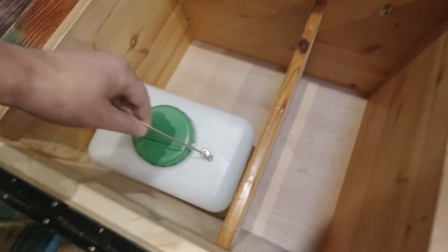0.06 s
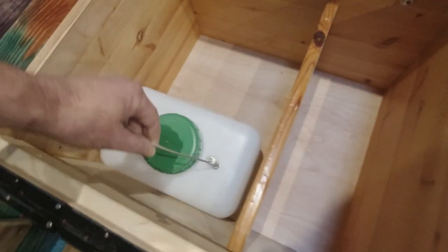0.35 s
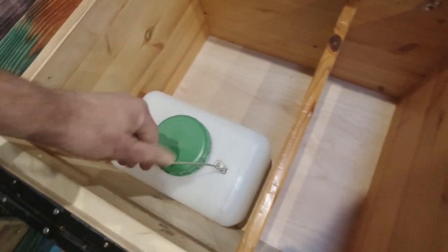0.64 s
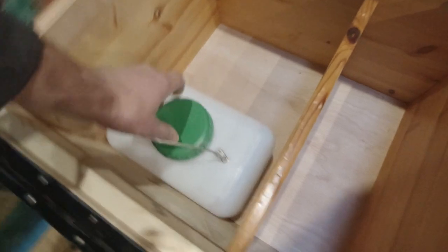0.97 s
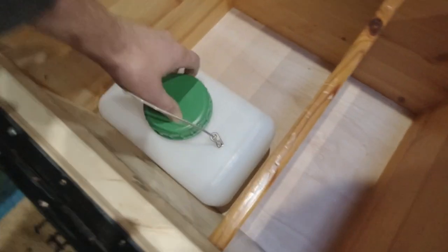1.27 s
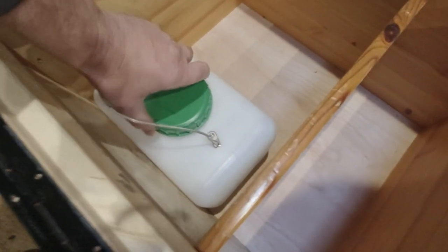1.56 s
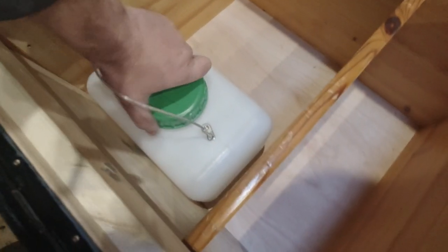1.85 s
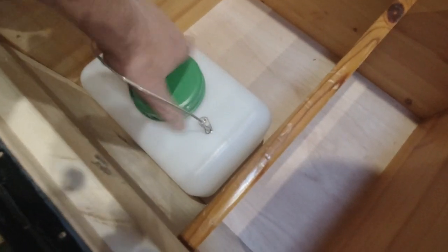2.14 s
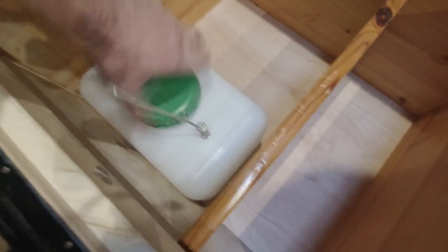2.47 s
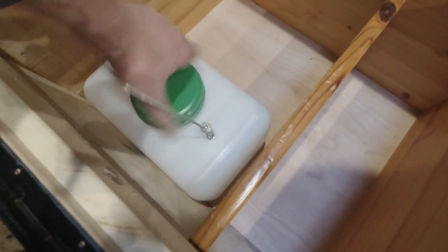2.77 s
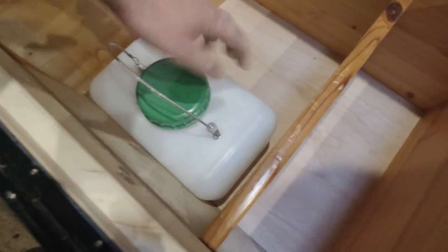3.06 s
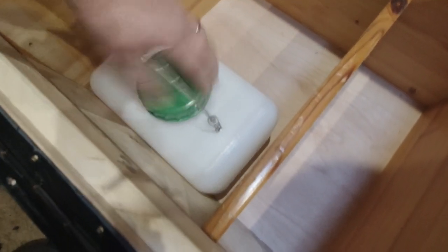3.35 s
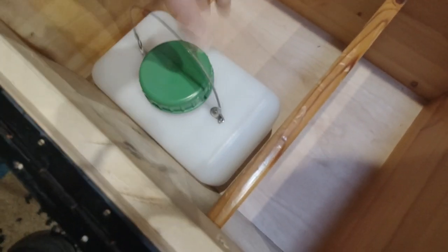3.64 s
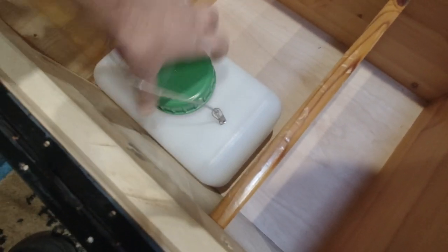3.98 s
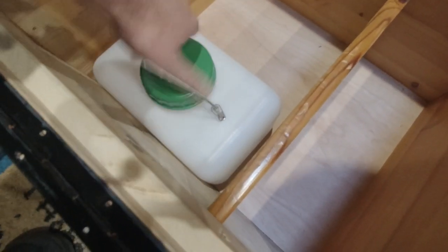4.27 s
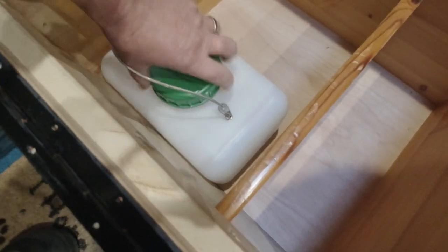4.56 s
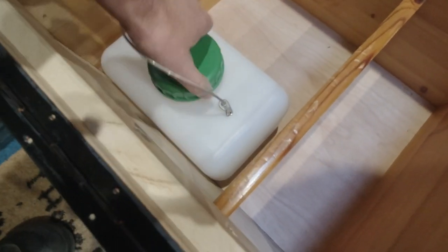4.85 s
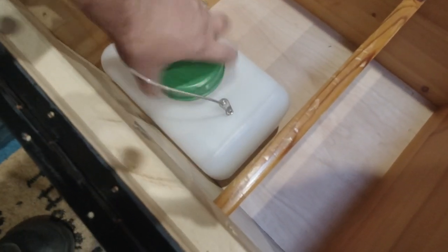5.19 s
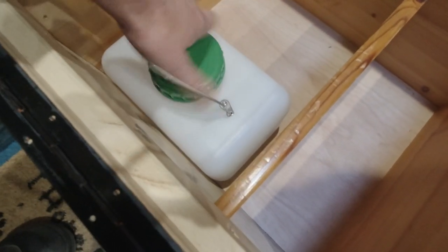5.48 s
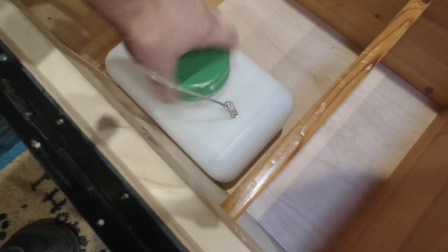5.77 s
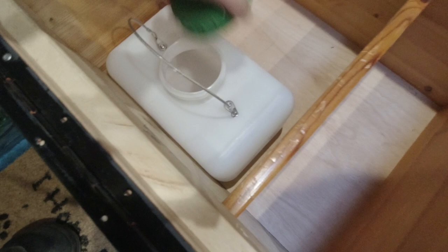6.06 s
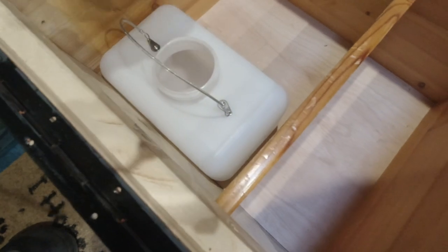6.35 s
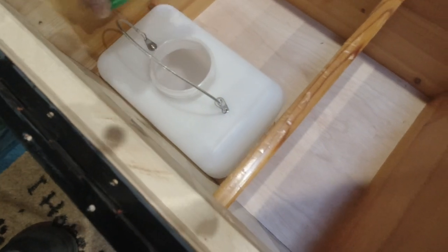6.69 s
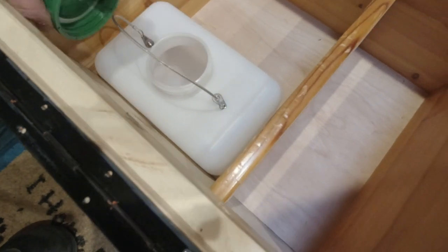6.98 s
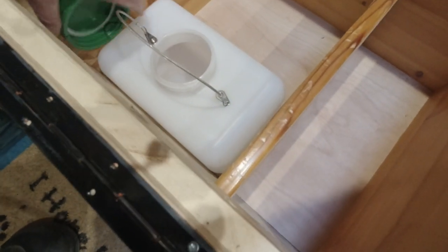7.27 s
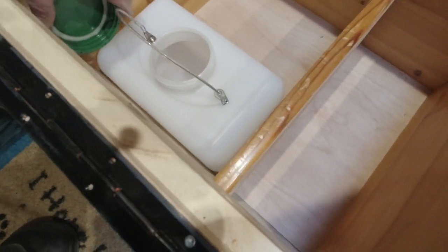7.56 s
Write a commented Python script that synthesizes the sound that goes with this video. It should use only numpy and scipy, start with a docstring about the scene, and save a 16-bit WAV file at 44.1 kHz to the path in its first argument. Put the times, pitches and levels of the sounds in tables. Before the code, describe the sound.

A wire handle is swung aside, knocking on a hollow plastic can with a low twang. A hand then unscrews the plastic cap in groups of sharp clicks, short rasps and soft thuds, with brief pauses between twists. At the end the open can is bumped and hums hollowly, and the cap clacks down on wood. The can sits in a small wooden box in a quiet room, heard from close above.

```python
"""A hollow plastic can knocks and rasps in a wooden box as a hand unscrews its cap.
Each impact excites the damped modes of walls and box, and a jolt sets the can rebounding; threads and
fingers rub by stick-slip friction. First a wire handle is swung aside and twangs; at the end the opened
can hums and the cap clacks down. A phone is held close above, in a quiet room."""
import sys
import numpy as np
from scipy import signal
from scipy.fft import rfft, irfft
from scipy.io import wavfile
from scipy.ndimage import uniform_filter1d, map_coordinates

SR = 44100
rng = np.random.default_rng(int(sys.argv[2]) if len(sys.argv) > 2 else 0)


def store_wav(level_fs):
    """Save 16-bit WAV to argv[1]."""
    pcm = np.round(np.clip(np.atleast_2d(level_fs), -1, 1) * 32767)
    wavfile.write(sys.argv[1], SR, pcm.T.astype(np.int16))


N = 344994
TIME = np.arange(N) / SR
AGE = TIME[:SR // 2]  # time since an impact
IMPACT_GAIN = np.sqrt(.03 * SR)  # unit energy to unit rms over 30 ms

# Spectra of the noises (f/Hz, relative level/dB)
AIR_SPECTRUM = [(60, -1.5), (200, -12.5), (3800, -28.5), (6000, -14.5), (12000, -26.5)]
RUMBLE_SPECTRUM = [(15, -4), (38, -12), (52, -4), (70, -1), (120, -16.5), (300, -50), (1000, -86)]
WHISTLE_SPECTRUM = [(3300, -26), (4080, -0.5), (4600, -30)]
RUSTLE_SPECTRUM = [(150, -9.5), (500, 4.5), (1500, -4.5), (4100, -5), (4900, -17)]
BRUSH_SPECTRUM = [(200, -19.5), (600, -6), (1700, -1.5), (2400, -6.5), (4100, 5), (5500, 6.5), (8000, 0.5),
                  (13000, -1)]
DRAG_SPECTRUM = [(90, -10), (180, -0.5), (310, -19), (480, 1), (700, -7), (1500, -27.5), (5000, -55.5)]
RUB_SPECTRUM = [(60, -29), (170, 7), (310, -5.5), (470, 2.5), (800, -2.5), (1300, -7.5), (2000, -13.5),
                (2400, -19), (2850, -23), (3400, -18.5), (4300, -19.5), (6000, -28.5), (12000, -37.5)]
# Spectra of the unresolved modes of room, loose cap and can (f/Hz, relative level/dB)
ROOM_SPECTRUM = [(100, 10.5), (500, -3.5), (1500, -5.5), (4000, -1.5), (6000, -6.0), (12000, 2.0)]
LANDING_SPECTRUM = [(120, -34.5), (550, -3.5), (1200, 4), (2500, -7.5), (9000, -50.5)]
KNOCK_SPECTRUM = [(70, -18), (170, 12.5), (310, -11.5), (450, -3), (700, -8), (1200, -8.5), (1750, -17),
                  (2300, -18), (3000, -17.5), (4300, -23), (7000, -32.5), (13000, -48.5)]
# Microphone response, and stereo side signal relative to mid (f/Hz, gain/dB)
MIC_RESPONSE = [(100, -1), (4400, -4.5), (5200, -17.5), (8000, -13), (10000, -23), (12000, -13)]
SIDE_RESPONSE = [(100, -39), (350, -21.5), (700, -15), (1400, -10.5), (2800, -7), (5000, -2), (9000, 1.5)]

# Normal modes (f/Hz, relative level/dB, t60/s)
WIRE_MODES = [(226.2, 4, 0.32), (275.5, -1.5, 0.15), (297.4, 0.5, 0.18), (365.8, -9, 0.24),
              (398.7, -1, 0.17)]
OPEN_CAN_MODES = [(193.5, -6.5, 0.5), (225.4, 3, 0.32), (248, -6.5, 0.39), (353, -2, 0.21),
                  (616, -21.5, 0.22), (836, -9.5, 0.16), (982, -3, 0.072), (1700, -13, 0.077),
                  (5870, -13, 0.044)]  # the strong mode near 225 Hz is the hollow hum of the open can
CAP_MODES = [(620, -1.5, 0.036), (812, -2.5, 0.15), (944, -2.5, 0.052), (1050, -5.5, 0.18),
             (1094, -0.5, 0.11), (1200, 0.5, 0.062), (1482, -3.5, 0.049), (1645, -11.5, 0.13),
             (2010, -9.5, 0.06), (2340, -11.5, 0.055), (2800, -17.5, 0.053), (4280, -21, 0.05)]
BODY_MODES = [(107, -8, 0.16), (143, -5, 0.13), (169.35, -2.5, 0.21), (173.3, 1.5, 0.15),
              (255.67, -16, 0.27), (282.3, -10, 0.13), (361.2, -9.5, 0.14), (443.7, -4, 0.099),
              (466.4, -3, 0.07), (533, -8.5, 0.11), (630, -15, 0.023), (705, -9, 0.12), (784, -4.5, 0.12),
              (845, -15, 0.16), (1047, -6, 0.13), (1234.4, -7, 0.11), (1479, -11, 0.023),
              (1706, -9.5, 0.11), (1764, -12.5, 0.13), (2035, -11.5, 0.02), (2903, -19, 0.16),
              (3670, -25.5, 0.095), (3990, -20, 0.15)]  # can and box
# Bands of a knock: can's thump, walls' knock, cap's clack, rim's snap
# (low f/Hz, high f/Hz, rise/s, t60/s, direct share)
KNOCK_BANDS = [(88, 260, 0.012, 0.076, 0.93), (256.88, 700, 0.0075, 0.1, 0.091),
               (701.1, 2200, 0.0021, .1, 0.26), (2360, 29000, 0.00033, 0.08, 0.27)]

# Spans of sustained noise (start t/s, duration/s, relative level/dB)
ARM_MOVES = [(0.0, 0.72, -52), (1.18, 0.5, -52.5), (2.07, 1.11, -51), (3.4, 2.75, -52.5)]
WHISTLES = [(1.55, 0.58, -75.5), (2.6, 0.46, -68), (4.18, .1, -71.5), (6.72, 1, -77.5)]
HAND_REACHES = [(0.0, 0.66, -60.5), (1.12, 0.18, -65), (7.15, 0.68, -67.5)]
THREAD_DRAGS = [(2.055, 0.051, -41), (2.3, 0.15, -40), (2.86, 0.11, -40), (5.9, 0.13, -42)]
RUB_STROKES = [(0.484, 0.0039, -41.5), (0.63, 0.021, -49.5), (1.26, 0.19, -63.5), (1.42, 0.52, -71),
               (2.05, 0.058, -44), (2.275, 0.15, -46), (2.525, 0.025, -43), (2.6, 0.077, -52),
               (2.85, 0.18, -41.5), (3.46, 0.18, -55), (3.96, 0.2, -67), (4.275, 0.19, -45),
               (4.785, 0.14, -42), (4.99, 0.1, -52), (5.37, 0.14, -41), (5.75, 0.018, -60.5),
               (5.918, 0.035, -39), (5.988, 0.033, -39), (6.513, 0.039, -48)]  # twists of the cap, slides of wire and skin
# Light touches of skin and cap on plastic and wood (centre t/s, half duration/s, level/dB)
BRUSHES = [(2.082, 0.055, -59), (2.343, 0.11, -53.5), (4.849, 0.037, -45), (6.526, 0.024, -43),
           (7.099, 0.041, -52), (1.28, 0.035, -55.5), (7.437, 0.07, -53), (7.687, 0.077, -57.5)]

# The handle strikes the can (t/s, level/dB, gain of lowest mode/dB)
WIRE_BLOWS = [(0.136, -16.5, -8.5), (0.355, -19, -14.5)]
# Bumps on the open can (t/s, level/dB, gain of upper modes/dB)
OPEN_CAN_BLOWS = [(6.476, -16.5, -0.5), (7.371, -37, 15.5), (7.439, -26.5, -14.5), (7.665, -31, -17)]
# The loose cap is set down, tips and settles (t/s, level/dB, tilt/(dB/octave))
CAP_LANDINGS = [(7.3714, -23.5, 0), (7.437, -25, -6.5), (7.661, -32, -3.5)]
# Contacts of cap edge, fingertips and wire (t/s, level/dB, centre f/Hz)
CLINKS = [(0.132, -33.5, 1248), (0.327, -44.5, 1560), (0.486, -35, 1236), (0.621, -38.5, 1560),
          (0.649, -43.5, 1510), (1.129, -66.5, 3650), (1.159, -63, 2810), (1.26, -52, 3220),
          (2.566, -55, 2070), (2.844, -42, 1262), (2.974, -49.5, 2826), (3.068, -31, 1176),
          (3.522, -48.5, 1973), (3.569, -42.5, 1100), (3.614, -42.5, 1645), (4.155, -60, 940),
          (4.321, -31, 1684), (4.395, -28, 1710), (5.037, -37, 1211), (5.531, -30.5, 1424),
          (5.763, -42, 850), (5.885, -50.5, 987), (6.513, -49.5, 1540), (6.532, -44.5, 1560),
          (7.176, -57.5, 2650), (7.322, -54.5, 3030)]
# Hard clicks and knocks of cap, threads and handle on the can
# (t/s, level/dB, tilt/(dB/octave), thump/dB)
HARD_CLICKS = [(0.464, -32, -2, -26), (1.258, -42.5, -5.5, -47.5), (2.476, -45.5, 1.5, -39.5),
               (2.628, -46.5, 2, -47), (2.68, -28, 1.9, -24), (2.846, -34.5, -1, -32),
               (2.973, -33.5, -0.5, -29.5), (3.066, -32, -0.5, -35), (3.082, -29, -2.5, -35),
               (3.403, -30, 0.83, -26), (3.523, -53, 5.5, -79), (3.571, -41, -4.5, -44.5),
               (3.613, -43.5, -0.5, -48), (3.971, -52.5, 0, -47.5), (4.153, -41, -3, -36),
               (4.323, -24.5, 2, -29.5), (4.396, -24, 1.2, -41), (4.419, -30, -2.5, -38.5),
               (4.501, -43.5, -1.5, -49), (4.748, -52.5, 1.5, -49.5), (4.825, -22.5, 0, -29.5),
               (4.963, -52, 1.5, -50), (5.037, -32.5, -0.8, -34), (5.062, -35.5, -2.5, -34.5),
               (5.314, -49, -0.5, -43), (5.365, -25.5, -1, -44.5), (5.45, -36.5, -0.5, -29.5),
               (5.53, -30.5, 0.5, -68), (5.541, -24, -1.5, -32.5), (5.621, -43, -2.5, -43.5),
               (5.763, -37, -1.5, -39), (5.884, -38.5, -2, -34), (6.473, -50, 5.5, -50.5),
               (7.437, -25, -1.5, -21)]
# Soft pushes of the fingers (t/s, thump/dB, wall knock/dB)
FINGER_THUDS = [(1.382, -36.5, -45.5), (1.471, -41, -62.5), (1.786, -36.5, -45), (2.784, -28.5, -38.5),
                (2.956, -31.5, -52), (3.627, -33, -46), (3.805, -40, -53.5), (4.001, -38.5, -61.5),
                (4.66, -48.5, -45), (4.896, -24, -35.5), (4.996, -31, -36.5), (5.394, -29, -62.5),
                (5.919, -26, -38.5), (5.959, -30, -37.5), (6.028, -33, -42), (6.075, -31, -73),
                (6.126, -40.5, -64.5)]
# The can rocks (t/s, level/dB, tilt/(dB/octave), thump/dB, first rebound/dB, loss per rebound/dB)
JOLTS = [(0.131, -26, -1.1, -38, -34, 25.5), (0.328, -21.5, -1, -31.5, -37.5, 28),
         (0.4327, -25.5, -2.5, -18.5, -24, 25.5), (0.483, -25, -4, -41, -35.5, 22),
         (0.622, -26, -2.5, -19, -21.5, 7.5), (7.662, -30.5, 1, -38, -30.5, 9.5)]

GRIP_DETUNE = .022  # relative scatter of mode frequencies under the hand


def undb(db):
    """Amplitude ratio of a level in decibels."""
    return 10 ** (np.asarray(db) / 20)


def unit(x):
    """Normalisation to unit energy."""
    return x / np.sqrt(np.sum(x ** 2) + 1e-18)


def gains(points, size):
    """Frequency response at each bin, interpolated in decibels over log frequency."""
    hz, db = np.transpose(points)
    bin_hz = np.arange(size // 2 + 1) * SR / size
    return undb(np.interp(np.log(bin_hz + 1), np.log(hz), db))


def colour(x, points):
    """Linear filtering by multiplication of spectra."""
    return irfft(rfft(x) * gains(points, len(x)), len(x))


def noise(points):
    """Stationary filtered Gaussian noise of unit rms."""
    return unit(colour(rng.standard_normal(N), points)) * np.sqrt(N)


def fade(t60, size=len(AGE)):
    """Exponential damping: 60 dB in t60 seconds."""
    return np.exp(-np.log(1000) * AGE[:size] / t60)


def ring(modes, scatter_db=0, size=len(AGE), detune=0):
    """Modal superposition: the contact point sets strength and phase, the grip shifts frequency."""
    out = np.zeros(size)
    for hz, db, t60 in modes:
        pitch = hz * (1 + detune * rng.standard_normal())
        envelope = undb(db + scatter_db * rng.standard_normal()) * fade(t60, size)
        out += envelope * np.sin(2 * np.pi * (pitch * AGE[:size] + rng.random()))
    return out


def add(track, s, sound):
    """Superposition of a sound on a track, starting at s seconds."""
    start = max(int(s * SR), 0)
    track[start:start + len(sound)] += sound[:N - start]


def swells(spans, arch_db=3.5, attack_s=0.18, release_s=0.026):
    """Incoherent addition: arched envelopes sum in power; attack and release each cover 60 dB."""
    power = 0
    for start, length, db in spans:
        along = np.clip((TIME - start) / length, 0, 1)
        arch = undb(db - arch_db * (2 * along - 1) ** 2)
        before = np.maximum(start - TIME, 0) / attack_s
        after = np.maximum(TIME - start - length, 0) / release_s
        skirts = np.exp(-np.log(1000) * np.minimum(before + after, 2))
        power = power + (arch * skirts) ** 2
    return np.sqrt(power)


def air(level_db=-71):
    """Stationary background noise of the quiet room."""
    return undb(level_db) * noise(AIR_SPECTRUM)


def rumble(rest_db=-78.5):
    """Structure-borne handling noise, which rises while the arm moves."""
    motion = swells(ARM_MOVES, arch_db=-1.5, attack_s=0.23, release_s=0.68)
    return (motion + undb(rest_db)) * noise(RUMBLE_SPECTRUM)


def room(x, t60=0.43, wet_db=-21):
    """Reverberation: convolution with a faint diffuse tail."""
    tail = colour(rng.standard_normal(len(AGE)), ROOM_SPECTRUM) * fade(t60)
    return x + undb(wet_db) * signal.fftconvolve(x, unit(tail))[:N]


def box_reflections(x, ripple_hz=70, echo_t60=0.065, echo_share=.8, drift_hz=1.2):
    """Interference: reflections reach two microphones in unlike phase, drifting as hand and phone move."""
    hz = np.arange(N // 2 + 1) * SR / N
    ripple = np.interp(hz / ripple_hz, np.arange(600), rng.standard_normal(600))
    side_spectrum = gains(SIDE_RESPONSE, N) * rfft(x)
    quadrature = irfft(1j * ripple / ripple.std() * side_spectrum, N)
    tail = unit(rng.standard_normal(len(AGE)) * fade(echo_t60))
    echoes = irfft(side_spectrum * rfft(tail, N), N)
    drifting = np.real(signal.hilbert(echoes) * np.exp(2j * np.pi * drift_hz * TIME))
    side = (quadrature + echo_share * drifting) / np.hypot(1, echo_share)
    return np.array([x + side, x - side])


def whistle():
    """Narrow-band noise, heard as a faint whistle that comes and goes."""
    return swells(WHISTLES) * noise(WHISTLE_SPECTRUM)


def hollow_resonance(x, t60=0.044, wet_db=3):
    """Modal overlap: close resonances of shell and box give friction a hollow grain."""
    response = unit(rng.standard_normal(len(AGE)) * fade(t60))
    ringing = signal.fftconvolve(x, response)[:N]
    return (x + undb(wet_db) * ringing) / np.hypot(1, undb(wet_db))


def moving_contact(x, depth_db=4.0, width_hz=170, changes_per_s=13, sag_hz_per_s=1500):
    """Time-varying resonance: as the contact travels, spectral peaks appear, slide down and vanish."""
    hz, s, frames = signal.stft(x, SR, nperseg=512)
    places = np.broadcast_arrays((hz[:, None] + sag_hz_per_s * s) / width_hz, s * changes_per_s)
    relief = rng.standard_normal((256, 256))
    peaks = undb(depth_db * map_coordinates(relief, places, order=1, mode="wrap"))
    return signal.istft(frames * peaks / np.sqrt(np.mean(peaks ** 2)), SR)[1][:N]


def rustling(uneven_db=4.0, changes_per_s=22):
    """Friction noise with random amplitude modulation as the hand reaches in and out."""
    flutter = np.interp(TIME * changes_per_s, np.arange(600), rng.standard_normal(600))
    return swells(HAND_REACHES, arch_db=-1.5) * undb(uneven_db * flutter) * noise(RUSTLE_SPECTRUM)


def brushing():
    """Light sliding friction: the hiss follows a bell-shaped pulse of pressure."""
    pressure = sum(undb(db) * np.exp(-((TIME - s) / half_s) ** 2) for s, half_s, db in BRUSHES)
    return pressure * noise(BRUSH_SPECTRUM)


def dragging():
    """Forced vibration: tight threads drag on the neck, and the hollow can groans."""
    return swells(THREAD_DRAGS) * noise(DRAG_SPECTRUM)


def rubbing(slips_per_s=2200, spread_db=2.5, contact_t60=0.021, body_db=-4.5, gain_db=7):
    """Stick-slip friction: each tiny slip rasps at the contact and excites the can's modes."""
    slips = (rng.random(N) < slips_per_s / SR) * rng.standard_normal(N)
    slips *= undb(spread_db * rng.exponential(size=N))
    force = unit(slips) * np.sqrt(N) * swells(RUB_STROKES)
    contact_power = signal.fftconvolve(force ** 2, unit(fade(contact_t60)) ** 2)[:N]
    rasp = np.sqrt(np.abs(contact_power)) * noise(RUB_SPECTRUM)
    body = signal.fftconvolve(force, unit(ring(BODY_MODES)))[:N]
    return undb(gain_db) * (hollow_resonance(moving_contact(rasp)) + undb(body_db) * body)


def wire_twang(rise_s=.003):
    """Free vibration of the wire handle after it strikes the can."""
    out, onset = np.zeros(N), 1 - np.exp(-AGE / rise_s)
    for s, db, lowest_db in WIRE_BLOWS:
        modes = undb(lowest_db) * ring(WIRE_MODES[:1]) + ring(WIRE_MODES[1:])
        add(out, s, undb(db) * onset * modes)
    return out


def open_can_hum(rise_s=.003):
    """Cavity resonance: the open can rings on with a hollow hum after a bump."""
    out, onset = np.zeros(N), 1 - np.exp(-AGE / rise_s)
    for s, db, upper_db in OPEN_CAN_BLOWS:
        modes = ring(OPEN_CAN_MODES[:3]) + undb(upper_db) * ring(OPEN_CAN_MODES[3:])
        add(out, s, undb(db) * onset * modes)
    return out


def cap_landings(dense_t60=.06, dense_db=1, rise_s=.001):
    """Impact on wood: the loose cap's modes ring freely above a short, dense clack."""
    out, onset = np.zeros(N), 1 - np.exp(-AGE / rise_s)
    for s, db, tilt_db in CAP_LANDINGS:
        modes = [(hz, mode_db + tilt_db * np.log2(hz), t60) for hz, mode_db, t60 in CAP_MODES]
        spectrum = [(hz, band_db + tilt_db * np.log2(hz)) for hz, band_db in LANDING_SPECTRUM]
        dense = colour(rng.standard_normal(len(AGE)), spectrum) * fade(dense_t60)
        sound = unit(ring(modes)) + undb(dense_db) * unit(dense)
        add(out, s, undb(db) * unit(sound * onset) * IMPACT_GAIN)
    return out


def cap_clinks(octaves=0.3, crack_cycles=60, modes_db=-3, held_t60=.11):
    """Selective excitation: the contact point sets the band of a crack and of the held cap's modes."""
    out = np.zeros(N)
    for s, db, hz in CLINKS:
        band = signal.butter(2, [hz / 2 ** octaves, hz * 2 ** octaves], "band", fs=SR, output="sos")
        crack = unit(signal.sosfilt(band, rng.standard_normal(len(AGE)) * fade(crack_cycles / hz)))
        held = ring(CAP_MODES, detune=GRIP_DETUNE) * fade(held_t60)  # damped by fingers and threads
        sound = crack + undb(modes_db) * signal.sosfilt(band, unit(held))
        add(out, s, undb(db) * unit(sound) * IMPACT_GAIN)
    return out


def contact(s, wall_db, tilt_db, thump_db, clack_db=-3.5, snap_db=-14):
    """Time and four band levels of a blow: a harder contact puts more energy in the high bands."""
    clack_octaves, snap_octaves = (np.log2(band[0] / KNOCK_BANDS[1][0]) for band in KNOCK_BANDS[2:])
    clack = wall_db + clack_db + tilt_db * clack_octaves
    snap = wall_db + snap_db + tilt_db * snap_octaves
    return s, thump_db, wall_db, clack, snap


def impacts(rebounds=3, rebound_s=.027, rebound_wall_db=-3.5):
    """Inelastic collisions: hard clicks, soft finger thuds, and jolts with dull, fading rebounds."""
    out = [contact(*click) for click in HARD_CLICKS]
    out += [contact(s, wall_db, tilt_db=-10.5, thump_db=db) for s, db, wall_db in FINGER_THUDS]
    for s, wall_db, tilt_db, thump_db, rebound_db, loss_db in JOLTS:
        out.append(contact(s, wall_db, tilt_db, thump_db))
        for k in range(rebounds):
            db = rebound_db - k * loss_db
            out.append(contact(s + (k + 1) * rebound_s, db + rebound_wall_db, tilt_db=-13, thump_db=db))
    return out


def band_responses(low_hz, high_hz, rise_s, t60, direct, dense_db, count, size=8192):
    """Impulse responses of can and box in one band, one per blow: resolved modes plus dense ringing."""
    band = signal.butter(3, [low_hz, min(high_hz, .45 * SR)], "band", fs=SR, output="sos")
    hiss = irfft(rfft(rng.standard_normal((count, size))) * gains(KNOCK_SPECTRUM, size))
    tails = signal.sosfilt(band, hiss) * fade(t60, size)
    modes = [mode for mode in BODY_MODES if low_hz <= mode[0] < high_hz]
    onset = 1 - np.exp(-AGE[:size] / rise_s)
    push = 1 + direct * np.exp(-(AGE[:size] / 0.015) ** 2)  # the wall's direct push stands out briefly
    sounds = []
    for tail in tails:
        resolved = ring(modes, scatter_db=3.8, size=size, detune=GRIP_DETUNE)
        ringing = unit(resolved) + undb(dense_db) * unit(tail)
        sounds.append(unit(ringing * onset * push) * IMPACT_GAIN)
    return sounds


def can_knocks(dense_db=-5, dense_step_db=3):
    """Impact response: the rim snaps at once, heavy walls swell later; modal density rises with pitch."""
    out, contacts = np.zeros(N), impacts()
    for k, band in enumerate(KNOCK_BANDS):
        sounds = band_responses(*band, dense_db + k * dense_step_db, count=len(contacts))
        for (s, *levels), sound in zip(contacts, sounds):
            add(out, s, undb(levels[k]) * sound)
    return out


def scene():
    """Superposition of the can's friction and impacts on rumble and room noise, in stereo."""
    friction = rubbing() + dragging() + hollow_resonance(moving_contact(brushing() + rustling()))
    struck = can_knocks() + wire_twang() + open_can_hum() + cap_clinks() + cap_landings()
    can = room(struck + friction + whistle())
    return box_reflections(can + rumble() + air())


def suppress_hiss(x, edge_hz=4650, open_db=-62, shut_db=-9):
    """Downward expansion: the treble is turned down while it is weak."""
    treble = signal.sosfiltfilt(signal.butter(6, edge_hz, "high", fs=SR, output="sos"), x)
    power = uniform_filter1d(np.mean(treble ** 2, axis=0), size=1500)
    gain = np.clip(np.sqrt(np.abs(power)) / undb(open_db), undb(shut_db), 1)
    return x + treble * (gain - 1)


def record(dry, ceiling=0.29, top_hz=13400):
    """Saturation and filtering: the phone rounds peaks, dulls treble, lowers hiss and cuts the top."""
    rounded = ceiling * np.tanh(dry / ceiling)
    dull = np.array([colour(channel, MIC_RESPONSE) for channel in rounded])
    lowpass = signal.ellip(8, .2, 70, top_hz, fs=SR, output="sos")
    return signal.sosfilt(lowpass, suppress_hiss(dull))


dry = scene()
out = record(dry)
store_wav(out)
```